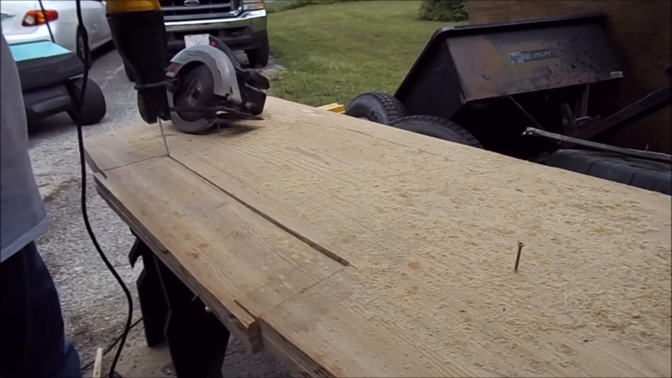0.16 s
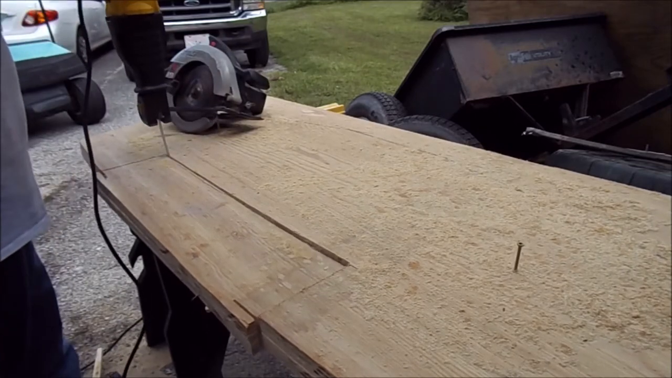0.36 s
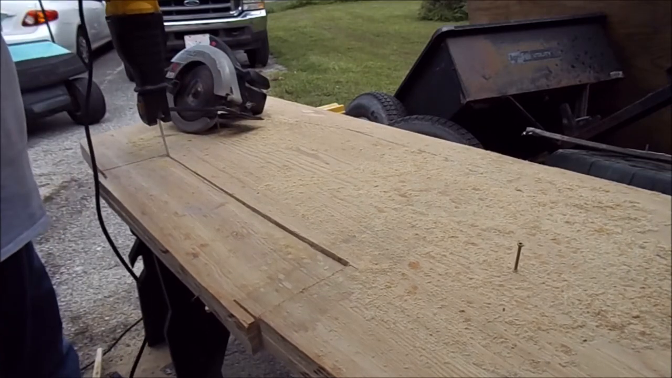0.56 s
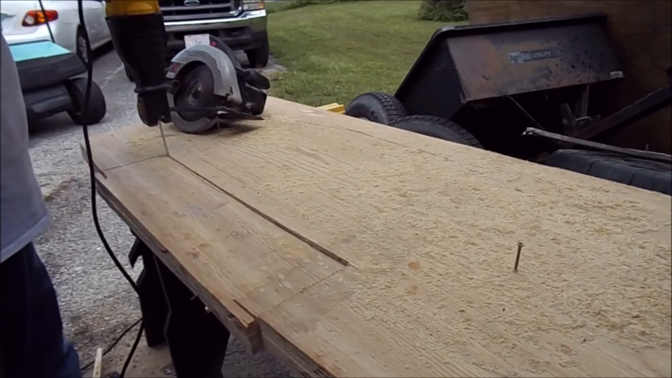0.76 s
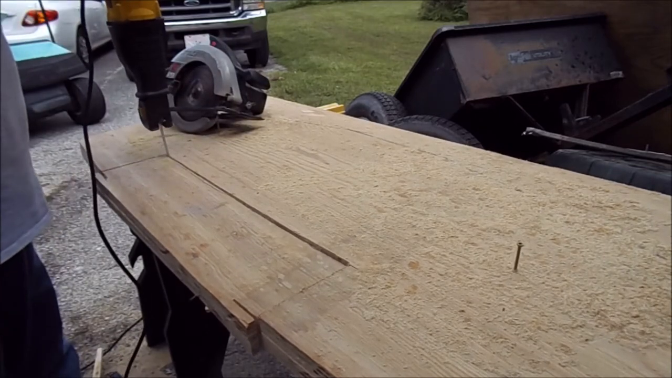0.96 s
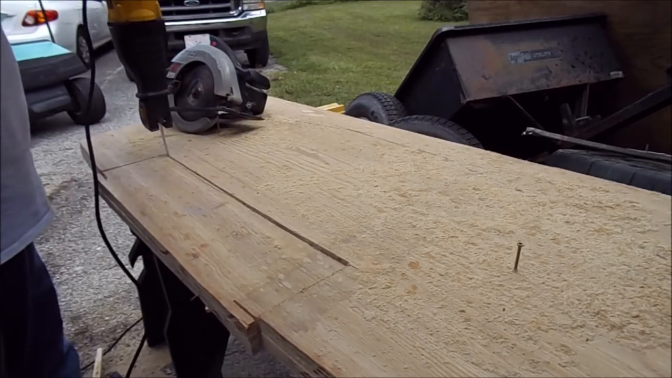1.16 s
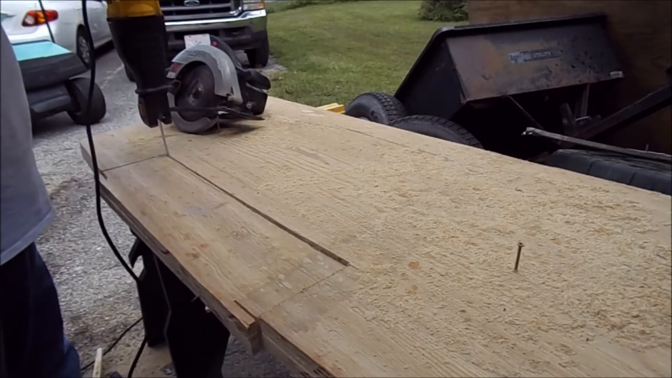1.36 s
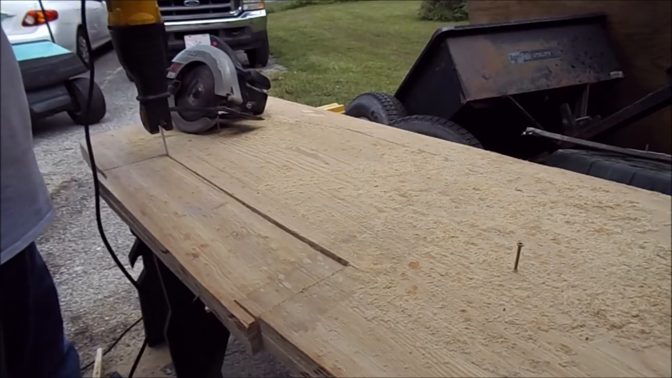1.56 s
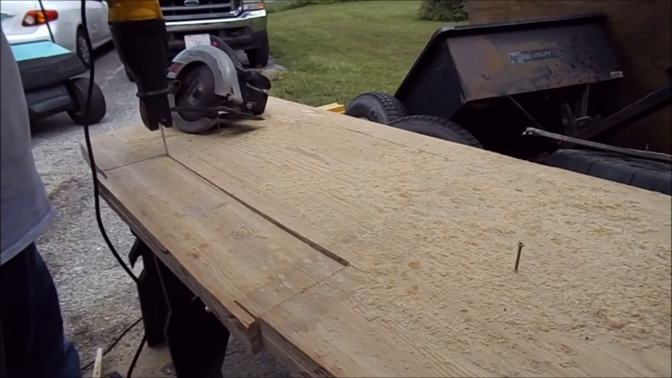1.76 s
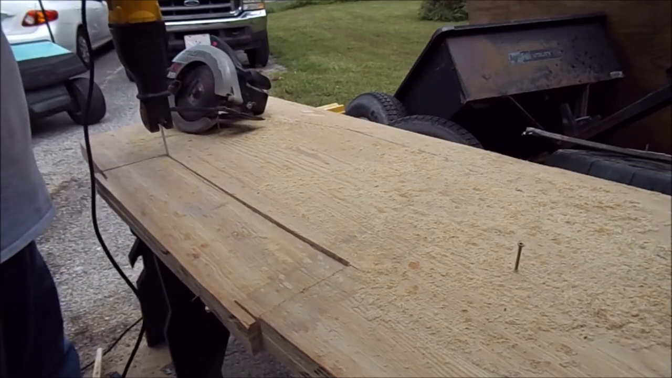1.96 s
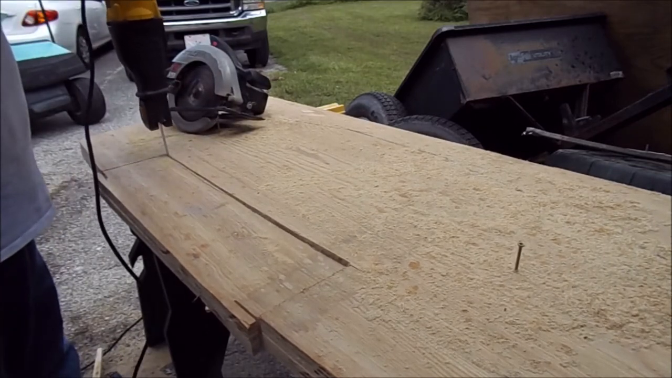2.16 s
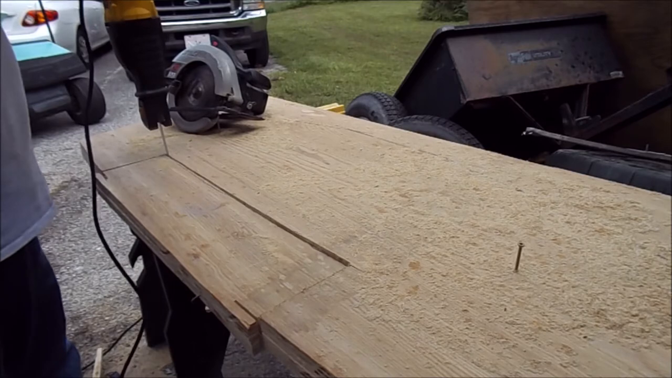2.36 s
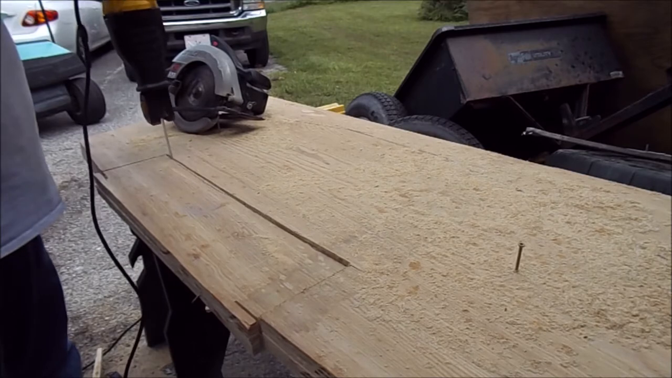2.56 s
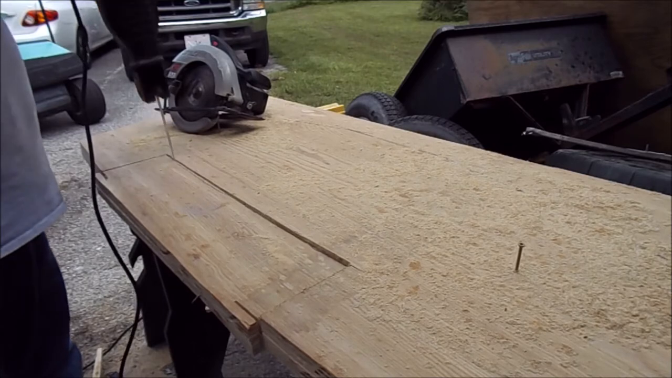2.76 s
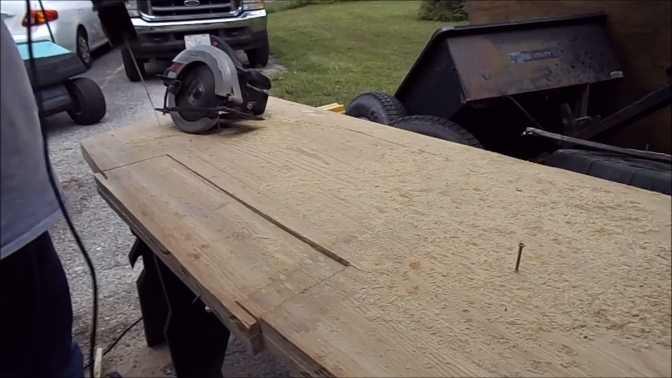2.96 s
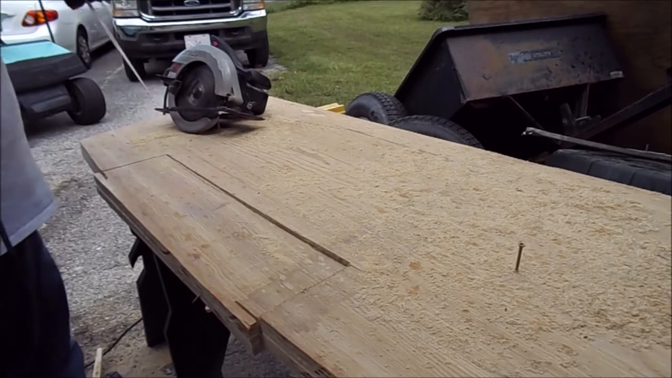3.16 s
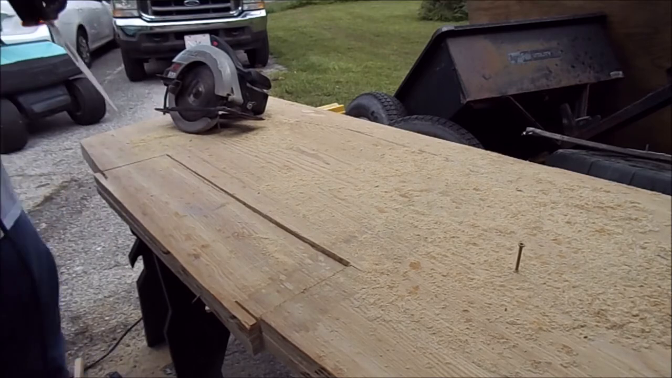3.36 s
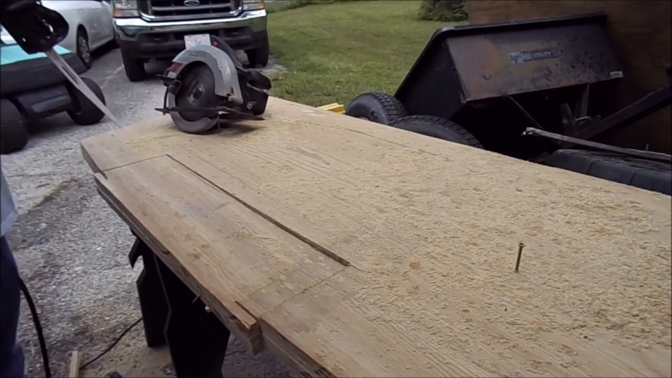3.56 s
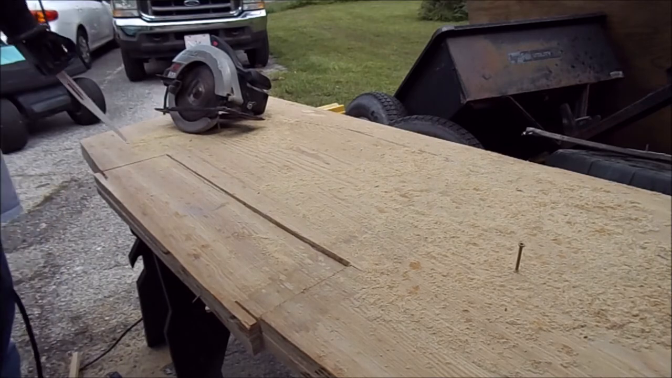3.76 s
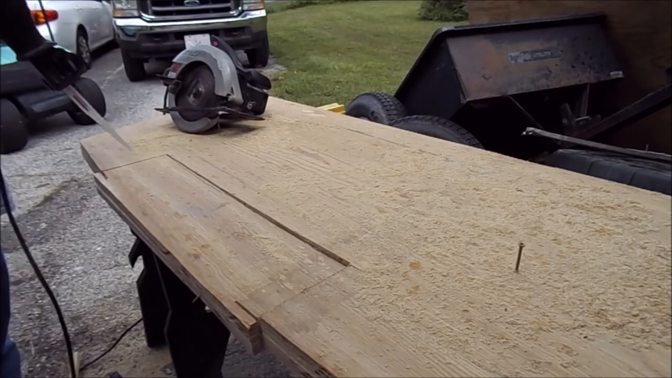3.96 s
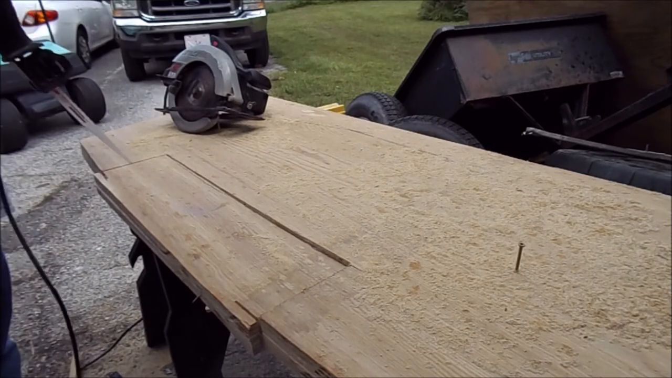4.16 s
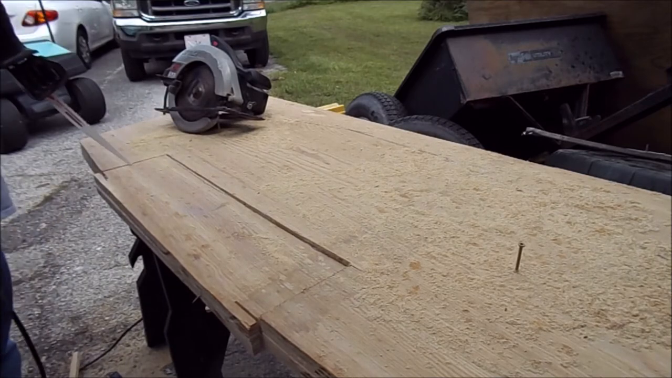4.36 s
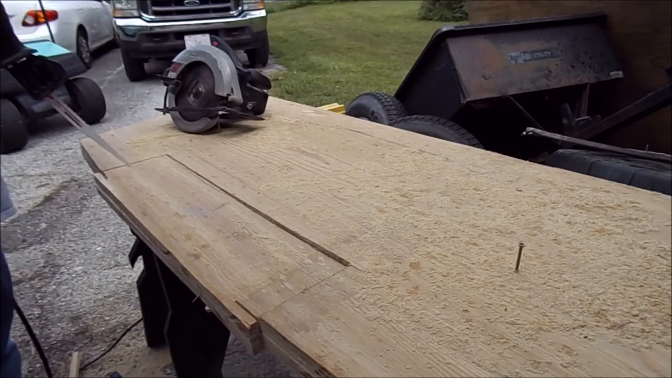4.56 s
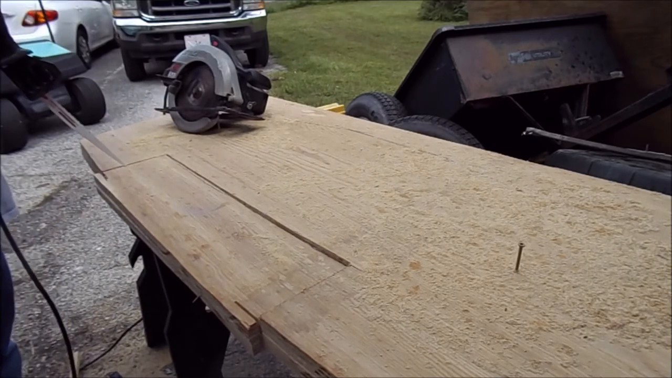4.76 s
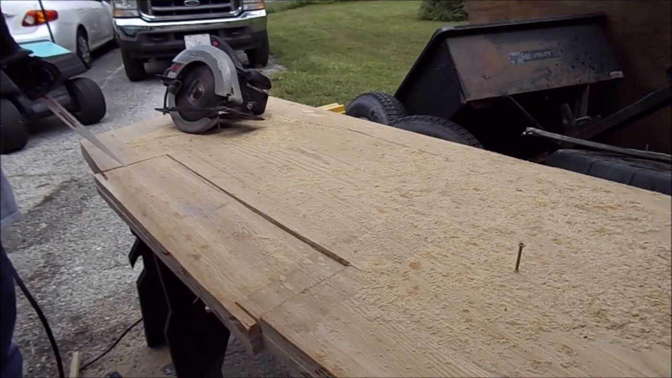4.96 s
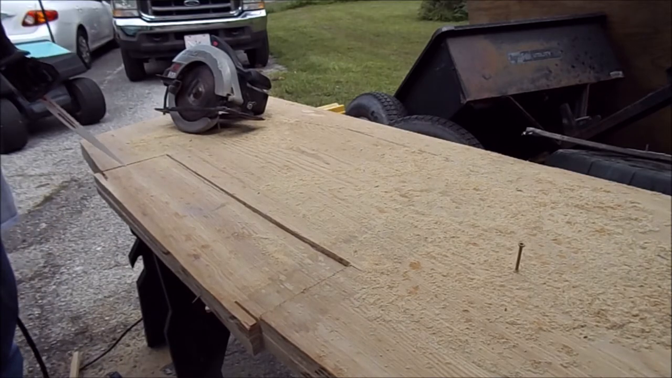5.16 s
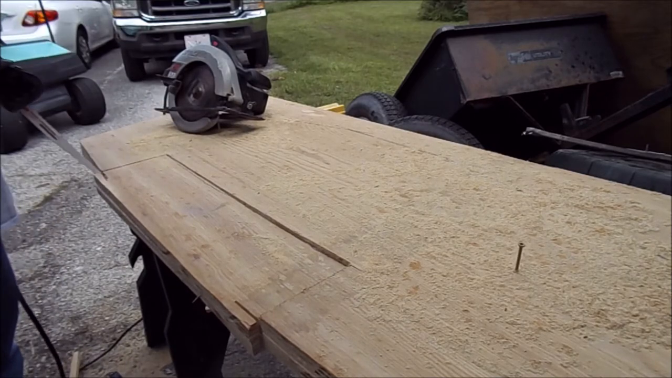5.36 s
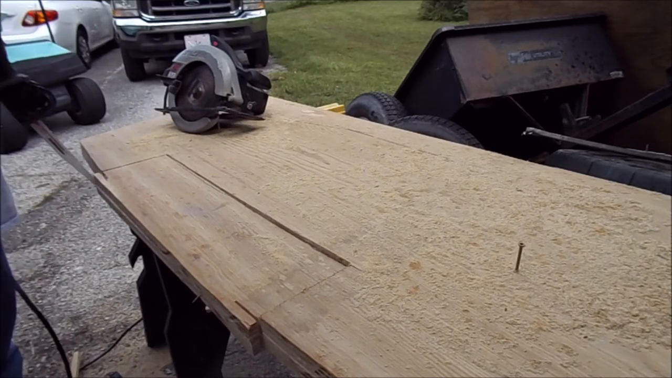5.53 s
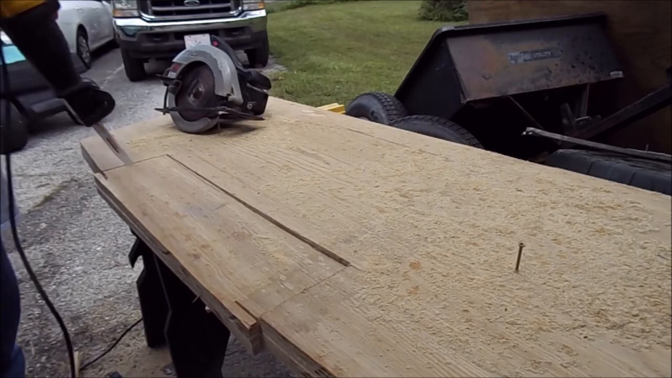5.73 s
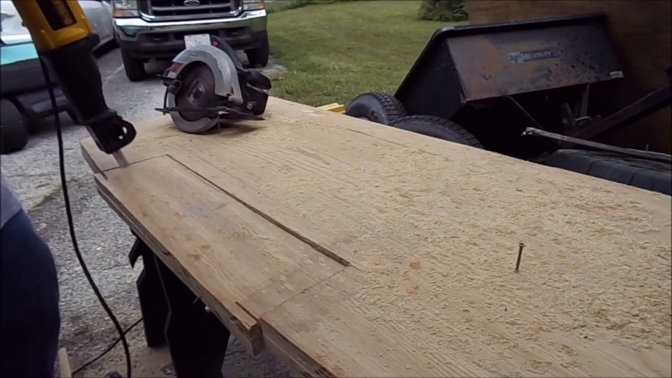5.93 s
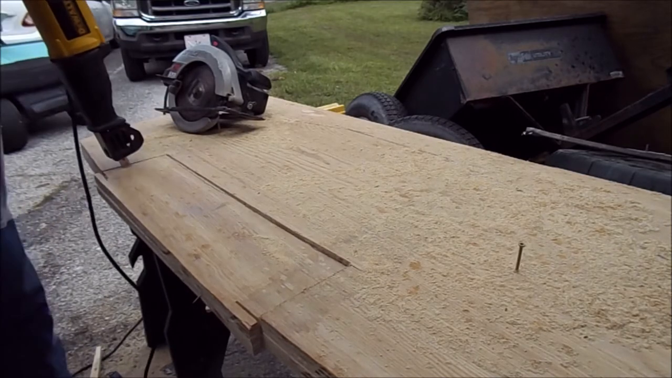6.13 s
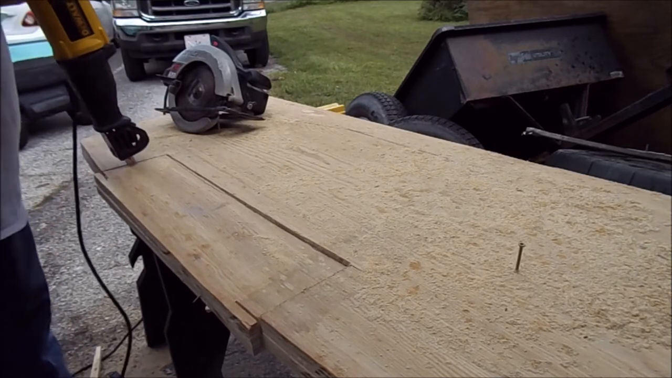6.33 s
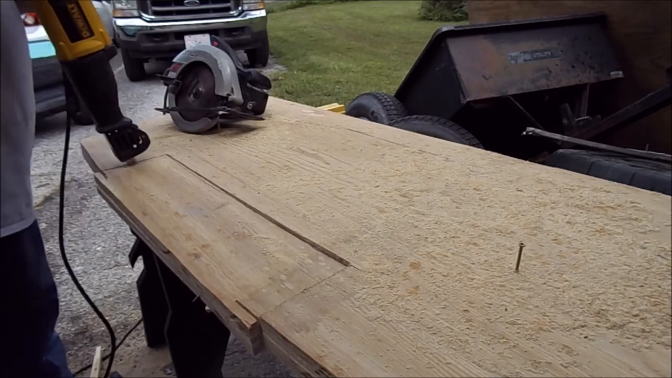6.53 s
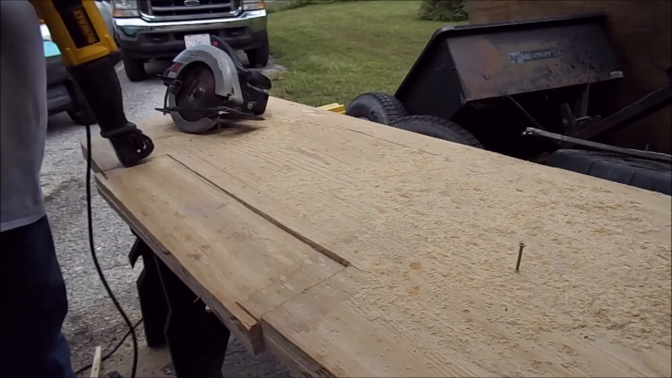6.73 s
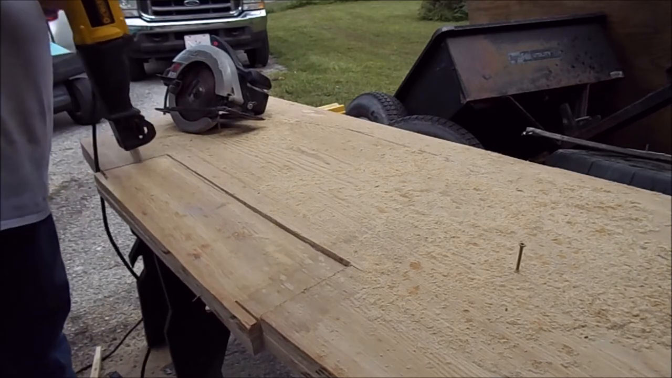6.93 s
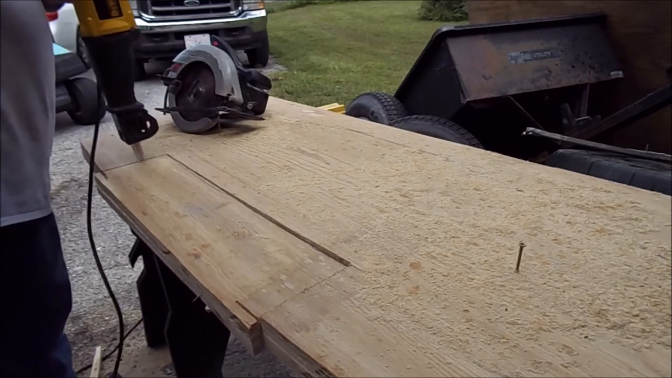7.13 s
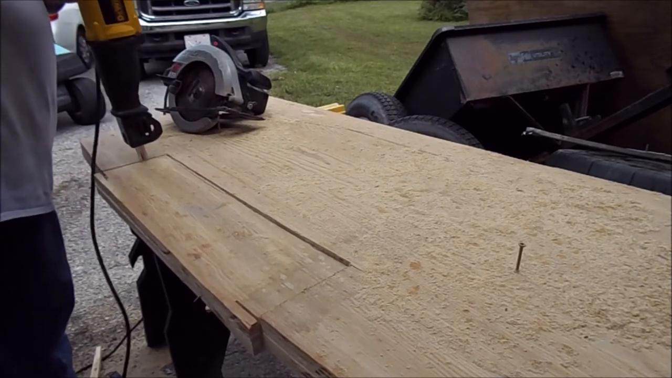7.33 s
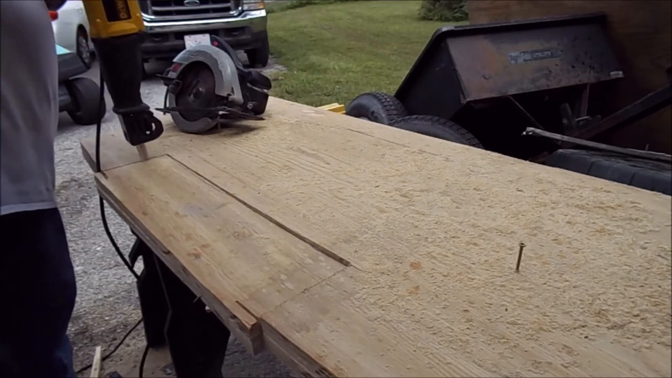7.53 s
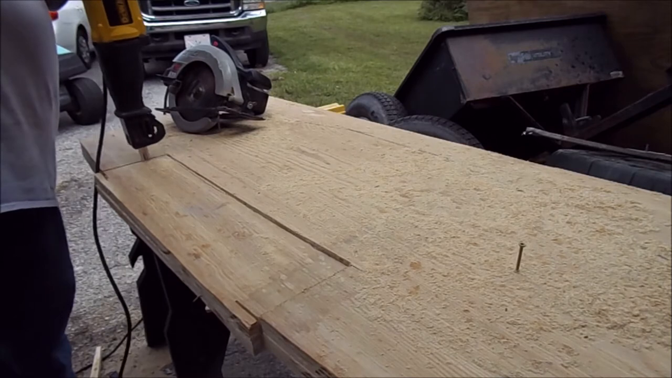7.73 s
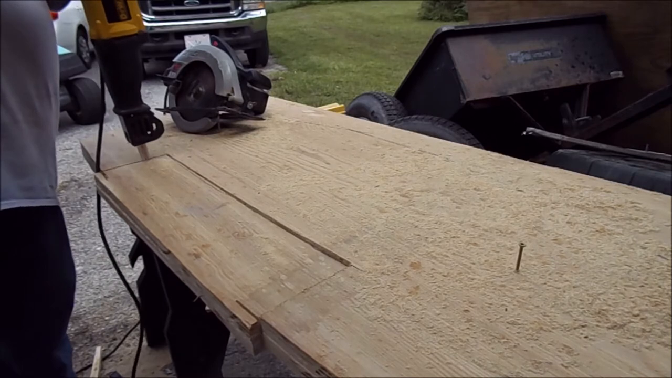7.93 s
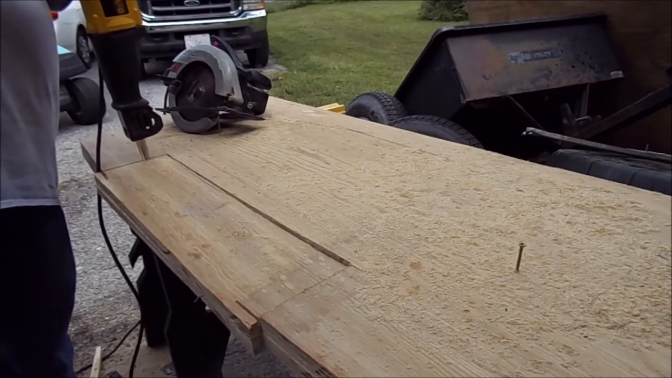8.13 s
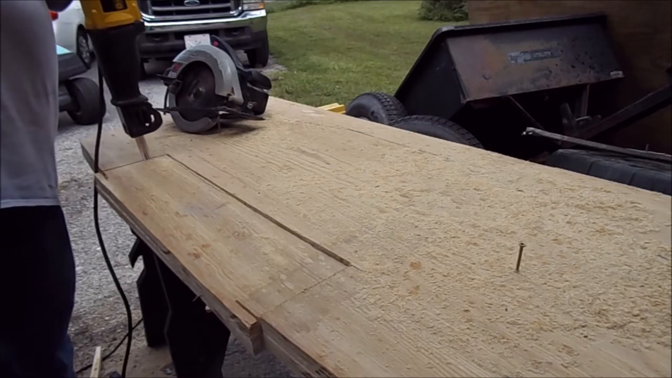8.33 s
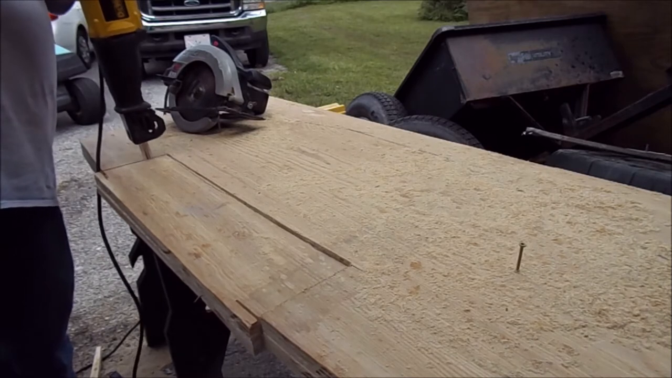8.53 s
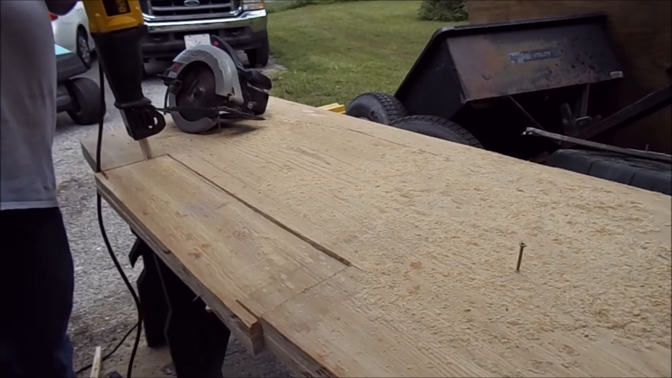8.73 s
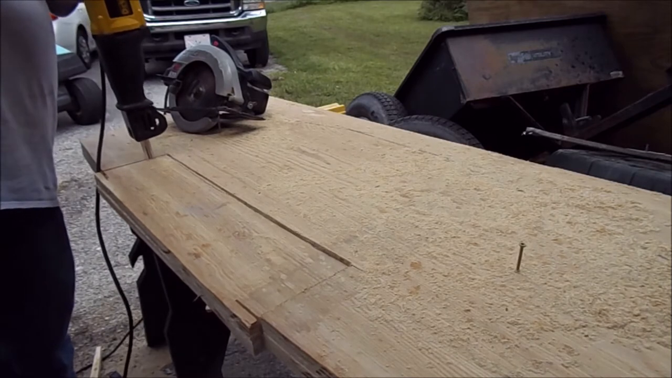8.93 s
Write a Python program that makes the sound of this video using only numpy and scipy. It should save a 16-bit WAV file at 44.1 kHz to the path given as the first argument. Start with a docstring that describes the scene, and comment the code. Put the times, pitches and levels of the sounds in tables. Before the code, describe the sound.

Outdoors, harsh fast saw chatter drops into a falling whine and ticking run-down, a few metallic taps follow, then the saw roars back into plywood.

```python
"""Reciprocating saw in plywood

Outdoors, a corded saw cuts a plywood sheet, coasts to a stop, is shifted and cuts again. Rough noise through
body resonances makes the gear rattle and sheet drumming; bright bursts at the stroke ends are blade slap.
Sines tied to the crank make the whine and stroke tones, noise-modulated ones the fan. Decaying modes make
knocks and clacks, clumped grains the scuffs, a quiet wash the yard. The microphone overloads on loud peaks."""
import sys
import numpy as np
from scipy import signal
from scipy.io import wavfile
from scipy.ndimage import uniform_filter1d

SR = 44100
rng = np.random.default_rng(int(sys.argv[2]) if len(sys.argv) > 2 else 0)


def magnitude_from_level(level_db):
    """Linear magnitude for a level in decibels (20 dB per decade)."""
    exponent = np.asarray(level_db, float) / 20
    return 10 ** exponent


def generate_wav(sig):
    """Save sig (samples, or channels by samples) to the path in sys.argv[1] as 16-bit PCM at SR."""
    pcm = np.round(np.clip(np.atleast_2d(sig).T, -1, 1) * 32767).astype(np.int16)
    wavfile.write(sys.argv[1], SR, pcm)


N = 396459

# smooth spectrum of metal scuffing wood: f/Hz, relative density/dB
SCUFF_COLOUR = [(59, -69.5), (100, -38), (498, -3.5), (1160, -1), (1770, 0.5), (3860, -9.5), (4760, -16.5),
                (15500, -34.5)]
# resonances of the scuff: f/Hz, width/Hz, relative level/dB
SCUFF_MODES = [(1790, 120, -13), (2700, 390, -11.5), (3250, 400, -11.5)]
SHAFT_PER_STROKE = 8.65  # motor turns in one stroke
STALL_HZ = 1.4  # the stroke rate at which the saw falls silent
LIFT_S, LIFT_LASTS_S, LOWER_S = 2.84, 0.72, 5  # middle and length of the lift; tool held low from here


def read(points, hz):
    """Interpolation on a logarithmic frequency axis: value of a spectrum between its points."""
    f, value = np.transpose(points)
    return np.interp(np.log(hz + 1), np.log(f + 1), value)


def evened(x):
    """Power normalisation: scales to rms 1."""
    return x / np.sqrt(np.mean(x ** 2) + 1e-20)


def colour(x, points, modes=(), under_db=0):
    """Minimum-phase filtering: a smooth spectrum with resonances standing on it, evened to rms 1."""
    hz = abs(np.fft.fftfreq(8192, 1 / SR))
    power = magnitude_from_level(2 * (read(points, hz) + under_db))
    for f, width, db in modes:
        power = power + magnitude_from_level(2 * db) / (1 + (2 * (hz - f) / width) ** 2) ** 2
    log_gain = np.log(power + 1e-10) / 2
    # the Hilbert transform of the log gain is the phase that makes the filter causal
    taps = np.fft.ifft(np.exp(log_gain - 1j * signal.hilbert(log_gain).imag)).real[:4096]
    return evened(signal.oaconvolve(x, taps)[:len(x)])


def wander(hz):
    """Low-passed randomness: slow chance of rms 1, from two equal poles."""
    step = 32
    pole = np.exp(-hz * step / SR * 2 * np.pi)
    slow = signal.lfilter([1], [1, -2 * pole, pole * pole], rng.standard_normal(N // step + 1))
    return np.interp(np.arange(N) / step, np.arange(len(slow)), evened(slow))


def grit(per_s, share, spread_db):
    """Impulsive noise: a steady hiss sharing its power with sparse sharp clicks of uneven size."""
    size_db = spread_db * np.minimum(rng.exponential(1, N), 4)
    clicks = (rng.random(N) < per_s / SR) * magnitude_from_level(size_db) * rng.choice([-1, 1], N)
    clicks = clicks / np.sqrt(uniform_filter1d(clicks ** 2, SR // 4) + 1e-9)
    share = np.clip(share, 0, 1)
    return np.sqrt(1 - share) * rng.standard_normal(N) + np.sqrt(share) * clicks


def yard():
    """Diffuse background: a quiet outdoor wash of filtered noise with a slowly wandering level."""
    # f/Hz, relative density/dB
    wash = [(18, -49), (30, -20), (97, -4), (200, -1), (324, -4), (700, 4.5), (1050, 3), (15500, -20.5)]
    return magnitude_from_level(-54.5 + .8 * wander(hz=3)) * colour(rng.standard_normal(N), wash)


def scuffs():
    """Sliding friction: shoe and blade dragged over the wood give clumped grains of noise."""
    # start/s, length/s, level/dB
    drags = [(3.978, 0.074, -39.5), (5.27, 0.17, -54.5), (5.716, 0.043, -34), (5.76, 0.11, -41),
             (5.867, 0.098, -37.5), (5.994, .28, -50.5), (6.462, .06, -42)]
    rise_db_per_s, fade_db_per_s = 700, 321
    t = np.arange(N) / SR
    levels = []
    for start, length, db in drags:
        before = np.maximum(start - t, 0)
        after = np.maximum(t - start - length, 0)
        levels.append(db - rise_db_per_s * before - fade_db_per_s * after)
    level_db = np.max(levels, axis=0) + 2.4 * wander(hz=60)
    grains = grit(per_s=900, share=.2, spread_db=0.5)
    return magnitude_from_level(level_db) * colour(grains, SCUFF_COLOUR, SCUFF_MODES, under_db=10.5)


def clacks(rows, modes, spread_db, detune):
    """Modal excitation: each blow rings the same modes, struck at another spot."""
    low_under_hz, rise_s = 1900, 0.00046
    out, t = np.zeros(N), np.arange(SR // 10) / SR
    for (s, db, low_db), luck in zip(rows, rng.standard_normal((len(rows), len(modes), 2))):
        ring = 0
        for (hz, mode_db, t60), (size, pitch) in zip(modes, luck):
            level_db = mode_db + low_db * (hz < low_under_hz) + spread_db * size - 60 * t / t60
            ring = ring + magnitude_from_level(level_db) * np.sin(2 * np.pi * hz * (1 + detune * pitch) * t)
        sound = np.minimum(t / rise_s, 1) * ring
        out[round(s * SR):][:len(t)] += magnitude_from_level(db) * sound / abs(sound).max()
    return out


def shoe_clacks():
    """Impact on a free plate: the loose steel shoe rings after each blow."""
    # t/s, peak level/dB, low modes against high/dB
    blows = [(4.305, -21, -10), (4.336, -32.5, -19), (5.713, -30, 10), (5.763, -21, 4), (5.785, -12.5, -1),
             (5.826, -24, 0), (5.881, -27, 4), (5.896, -19.5, -7), (5.944, -27, 5)]
    # f/Hz, relative level/dB, t60/s
    plate = [(1650, 0, .04), (2600, -4, .025), (2860, 1, .035), (3400, -3, .025), (3850, -8, .018)]
    return clacks(blows, plate, spread_db=3.5, detune=0.021)


def gear_clacks():
    """Backlash: play in the gears knocks the case as the tool runs down."""
    # t/s, peak level/dB
    blows = [(2.837, -18), (2.903, -10), (2.988, -12), (3.029, -10), (3.053, -11), (3.082, -15),
             (3.169, -13), (3.302, -13), (3.379, -11.5), (3.447, -12.5), (3.518, -17), (3.605, -20),
             (3.658, -25), (3.673, -28), (3.699, -33), (3.723, -30), (3.777, -27), (3.811, -32),
             (4.041, -25)]
    # f/Hz, relative level/dB, t60/s
    case = [(1170, -1.5, .018), (2050, -2, .016), (2440, 0, 0.016), (3090, 1, 0.012)]
    dulling_db_per_s = 4.0  # slower clacks favour the low modes
    rows = [(s, db, dulling_db_per_s * (s - LIFT_S - LIFT_LASTS_S)) for s, db in blows]
    return clacks(rows, case, spread_db=5.5, detune=0.033)


def knocks():
    """Impact of metal on wood: short modes, a crack, and a burst of rough noise that dies with them."""
    # hard taps: t/s, peak level/dB, pitch f/Hz, treble against it/dB
    taps = [(4.221, -31, 1010, -32), (4.414, -35.5, 2390, -26), (4.546, -35, 1400, -9),
            (4.575, -19, 1037, -16.5), (5.723, -18.5, 2170, -8), (5.972, -22, 1960, -29),
            (6.087, -20.5, 2900, -13), (6.272, -27, 2190, -37), (6.31, -32, 2280, -27.5),
            (6.454, -16.5, 2040, -20), (6.532, -12, 1830, -26.5)]
    # glancing bumps (blade leaves the cut, tool is shifted, first strokes bite): t/s, peak level/dB,
    # pitch f/Hz, treble against it/dB
    bumps = [(2.772, -4.5, 2100, -11.5), (3.985, -27.5, 896, -10.5), (4.302, -23, 2880, -12),
             (4.326, -30.5, 3200, -14), (4.586, -36.5, 1028, -24), (5.183, -24, 1310, -9.5),
             (5.363, -29, 1480, -31), (5.44, -33, 1170, -3.5), (5.71, -20, 1886, -17),
             (5.784, -19.5, 1914, -31), (5.895, -22, 2720, -25.5), (5.928, -27, 1790, -19.5),
             (6.053, -28.5, 513, -26.5), (6.491, -21.5, 2344, -20), (6.599, -1, 2270, -21),
             (6.684, -2.5, 3050, -14), (6.721, -1, 2750, -16)]
    # rise/ms, first snap level/dB, of a tap and of a bump
    tap_onset = (0.62, 8)
    bump_onset = (6, -9)
    # wooden modes: factor on pitch, relative level/dB, t60/s
    wood = [(0.98, 12, 0.04), (0.85, -4.5, 0.095), (0.73, 0, 0.071)]
    # f/Hz, relative density/dB
    crack = [(2500, -16.5), (5500, 8.5), (15500, -14.5)]
    burst_t60, snap_t60 = 0.065, .012  # s
    out, t = np.zeros(N), np.arange(SR // 5) / SR
    grains = grit(per_s=520, share=.4, spread_db=-1.5)
    rough = colour(grains, SCUFF_COLOUR, SCUFF_MODES, under_db=-13.0)
    bright = colour(rng.standard_normal(N), crack)
    rows = [(*row, *tap_onset) for row in taps] + [(*row, *bump_onset) for row in bumps]
    phases = rng.random((len(rows), len(wood)))
    for (s, db, hz, treble_db, rise_ms, snap_db), turn in zip(rows, phases):
        start = round((s - rise_ms / 2000) * SR)  # the time marks the middle of the rise
        at = slice(start, start + len(t))
        ring = sum(magnitude_from_level(d - 60 * t / t60) * np.sin(2 * np.pi * (hz * factor * t + phase))
                   for (factor, d, t60), phase in zip(wood, turn))
        burst = (magnitude_from_level(9.0) * rough[at] + magnitude_from_level(treble_db + 9.0) * bright[at]) * magnitude_from_level(-60 * t / burst_t60)
        rise = np.minimum(1000 * t / max(rise_ms, .2), 1) ** 2
        sound = (ring + burst) * (1 + magnitude_from_level(snap_db - 60 * t / snap_t60)) * rise
        out[at] += magnitude_from_level(db) * sound / abs(sound).max()
    return out


def echoes(hits):
    """Multiple reflection: ground and parked cars return a tail of dying echoes of either sign."""
    taps = np.zeros(SR // 8)
    at = np.arange(250, len(taps) - 40, 40)
    gain = magnitude_from_level(-20.0 - 60 * at / SR / 0.17)  # t60 0.17 s
    taps[at + rng.integers(0, 40, len(at))] = rng.choice([-1, 1], len(at)) * gain
    return signal.oaconvolve(hits, taps)[:N]


def strokes(t):
    """Rotor dynamics: stroke rate in Hz climbs under power, runs down against friction and drag."""
    # full speed as the load allows it: t/s, stroke rate f/Hz
    full_speed = [(.9, 35.95), (1.6, 36.35), (2.3, 37.4), (7, 37.8), (8.35, 37.7), (8.99, 36.9)]
    # a jerk and a slower climb: shortfall at the pull f/Hz, time constant/s
    spin_up = [(12.3, .035), (19.5, .22)]
    pull_s, release_s, repull_s = -.35, 2.42, 6.52  # trigger pulled, let go, pulled again
    friction, drag = 15.2, .0165  # bearings in Hz per s; fan in Hz per s per Hz squared
    since = t - np.where(t < repull_s, pull_s, repull_s)
    shortfall = sum(hz * np.exp(-since / s) for hz, s in spin_up)
    driven = np.interp(t, *np.transpose(full_speed)) - shortfall
    # constant plus square-law braking makes the speed a tangent of time
    knee = np.sqrt(friction / drag)
    angle = np.arctan(np.interp(release_s, t, driven) / knee) - friction / knee * (t - release_s)
    run_down = np.maximum(knee * np.tan(np.clip(angle, 0, 1)), STALL_HZ)
    coasting = (t > release_s) & (t < repull_s)
    return np.where(coasting, run_down, driven), coasting


def fan_whirr(t, turns, free):
    """Narrow-band noise: slow noise on a carrier tied to the crank gives the cooling fan's fuzzy bands."""
    # multiple of the stroke, noise bandwidth setting/Hz
    bands = [(251, 130), (258, 150), (268, 130), (311.4, 100)]
    # level against the hiss/dB: held upright, held low
    band_db = [(-10, -11.5), (-17, -22.5), (-20.5, -10.5), (-11, -12)]
    out = np.zeros(N)
    for (multiple, hz), db in zip(bands, band_db):
        level = magnitude_from_level(np.where(t < LOWER_S, *db)) * (1 - free) ** 0.83
        out += level * wander(hz) * np.sin(2 * np.pi * multiple * turns)
    return out


def slot_whine(speed, turns, coasting, free):
    """Harmonic series of the slot-passing frequency, loudest where the casing rings."""
    # f/Hz, level against the hiss/dB before the changes with load and speed
    casing = [(3900, -18), (5000, -8), (6700, -2.5), (7800, -17), (9000, -11), (10000, -16.5), (10800, -9),
              (11700, -23.5), (13000, -27.5), (15000, -35)]
    per_stroke = 12 * SHAFT_PER_STROKE  # 12 armature slots
    # the load shakes the pitch
    slots = per_stroke * turns + np.where(coasting, .011, .045) * wander(hz=60)
    # fainter without current, clearer as the air noise dies, gone near rest
    coasting_db = 24 * free - 19 - 2.5 * np.maximum(8 - speed, 0)
    load_db = np.where(coasting, coasting_db, -40 * free)
    out = np.zeros(N)
    for k in range(1, 21):  # as the motor slows, higher multiples fall into hearing
        hz = k * per_stroke * speed
        fading_db = 5.0 * np.minimum(wander(hz=16), .6)  # each tone fades in and out
        out += (hz < 15500) * magnitude_from_level(read(casing, hz) + load_db + fading_db) * np.sin(2 * np.pi * k * slots)
    return out


def air_hiss(swing, chatter):
    """Turbulence and brush noise: gritty broadband noise swinging with the stroke."""
    # f/Hz, relative density/dB
    spectrum = [(2060, -38.5), (3500, -6), (4550, -10.5), (6450, -13), (8230, -14.5), (9380, -13.5),
                (10600, -18), (11700, -16), (15500, -27.5)]
    noise = swing * grit(per_s=1100, share=0.12, spread_db=12.5) * chatter ** .4
    return colour(noise, [(400, -79.5)] + spectrum)


def stroke_lines(t, turns):
    """Periodic forcing: clean sines at multiples of the stroke rate."""
    # multiples of the stroke, the last from the gear teeth
    multiples = [3, 4, 5, 6, 7, 9, 13, 14, 16, 18, 21, 54.2]
    # level against the rattle/dB: in the first cut, in the second
    line_db = [(-39.5, -52), (-47.5, -46), (-32, -34.5), (-42, -38.5), (-34, -33.5), (-37, -34.5),
               (-27.5, -29.5), (-29, -34.5), (-34, -27), (-26, -20.5), (-20.5, -38), (-9, -33.5)]
    out = np.zeros(N)
    for k, db in zip(multiples, line_db):
        level = magnitude_from_level(np.where(t < LOWER_S, *db) + 0.6 * wander(hz=12))
        out += level * np.sin(2 * np.pi * (k * turns + rng.random()))
    return out


def sheet_drum(t, swing):
    """Plate resonance: the noise of the teeth drives the modes of the sheet while the blade is in it."""
    # modes in each cut: f/Hz, width/Hz, relative level/dB
    cuts = [(494, 44, -8), (565, 40, -1.5), (648.3, 32, 1), (744.7, 28, 4), (819, 66, -3)], [(491.3, 14, 2),
            (581, 66, 1), (655, 24, 12.5), (852, 41, 2)]
    # t/s, level against the rattle/dB
    drum = [(0, -8.5), (.7, -8.5), (2.1, -10.5), (6.5, -16), (6.75, -16), (6.9, -11.5), (7.04, -12.5),
            (7.3, -20), (8.2, -16.5), (8.99, -18)]
    through_s = 2.12  # the blade breaks out of the first cut
    cutting = uniform_filter1d(1. * ((t < through_s) | (t > LOWER_S)), SR // 20)
    teeth = swing * rng.standard_normal(N)
    first, second = (colour(teeth, [(1, -90), (SR, -90)], modes) for modes in cuts)
    return magnitude_from_level(np.interp(t, *np.transpose(drum))) * cutting * np.where(t < LOWER_S, first, second)


def blade_slaps(t, turns, speed):
    """Repeated impact: two bright bursts of uneven size a stroke, staying short and sharp as the strokes slow
    in the coast."""
    # t/s, level against the rattle/dB
    slap_db = [(0, -16.5), (2.4, -7), (2.9, -19), (4, -15), (6.5, -6.5), (7.2, -5.5), (8.99, -11)]
    # f/Hz, width/Hz, relative level/dB
    ringing = [(3380, 1140, 0.5), (2294, 1020, 1)]
    slap_s, partner, width_s = 7.0415, .4, 0.0015  # one slap's time; its partner's place in turns
    phase = turns - np.interp(slap_s, t, turns)
    halves = np.interp(phase % 1, [0, partner, 1], [0, 1, 2]) + 2 * np.floor(phase)
    nearest = np.round(halves).astype(int)
    size_db = 5.8 * rng.standard_normal(np.ptp(nearest) + 1).clip(-3, 1.5)[nearest - nearest.min()]
    pulse = np.exp(-((halves - nearest) / (2 * speed * width_s)) ** 2)
    burst = magnitude_from_level(size_db) * pulse * rng.standard_normal(N)
    return magnitude_from_level(np.interp(t, *np.transpose(slap_db))) * colour(burst, [(1, -90), (SR, -90)], ringing)


def motor_ticks(shaft, free):
    """Gear chatter: one tick of uneven size a motor turn, dying before the next, plainer at low speed."""
    size_db = 2.0 * rng.standard_normal(round(shaft.max()) + 3)[np.floor(shaft).astype(int) + 1]
    return magnitude_from_level(free * (size_db - 14 * (shaft % 1) + 6.0))


def gear_rattle(t, swing, chatter, shaft, free, coasting):
    """Source and filter: gear noise and clicks ring the tool body, whose modes change with its hold."""
    # held upright, smooth spectrum: f/Hz, relative density/dB; modes: f/Hz, width/Hz, relative level/dB
    upright = [(35, -57.5), (60, -68), (288, -22), (738, -6), (1250, -5), (1380, -5), (2260, 2),
               (6500, -23.5), (8450, -48), (14300, -120)]
    upright_modes = [(1400, 77, 0.5), (1900, 280, -3), (2310, 13, 8), (3036, 51, -2), (3402, 53, -3)]
    # lifted free, the same columns
    lifted = [(35, -89), (60, -60), (1010, 8), (2490, 1), (2800, -3.5), (3030, -1), (3750, -19),
              (6500, -10), (8450, -20.5), (14300, -120)]
    lifted_modes = [(1136, 240, 5.1), (2480, 230, 15), (3090, 260, 11)]
    # held low, the same columns
    low = [(35, -75), (60, -69), (443, -16.5), (656, -8.5), (782, -4.5), (2390, 2.5), (3030, 1.5),
           (6500, -28.5), (8450, -57), (14300, -120)]
    low_modes = [(1400, 40, 0.5), (2520, 88, -1.5), (3050, 98, 2.5), (3386, 19, 6), (4170, 56, -7)]
    new_turn = np.diff(np.maximum.accumulate(np.floor(shaft)), prepend=0).clip(0, 1)
    clicks = magnitude_from_level(10) * free * coasting * new_turn  # a click each slow motor turn
    gears = swing * chatter * (grit(per_s=900, share=0.13, spread_db=2.5) + clicks)
    lift = np.clip((t - LIFT_S) / LIFT_LASTS_S + .5, 0, 1) * (t < LOWER_S)
    return (colour(gears, upright, upright_modes, under_db=-3.0) * np.sqrt(1 - lift) * (t < LOWER_S)
            + colour(gears, lifted, lifted_modes, under_db=7) * np.sqrt(lift)
            + colour(gears, low, low_modes, under_db=-3.5) * (t >= LOWER_S))


def saw():
    """Common drive: everything that turns with the crank shares its phase, speed and swings."""
    # swing over one stroke, for rattle, hiss and sheet: times a stroke, depth/dB, lag/turns
    swing_rows = [
        [(1, 0.5, 0.18), (3, 1.5, 0.66)],
        [(1, 1, 0.93), (2, 1, 0.51)],
        [(1, -3, 0.54), (2, -4, 0.96)],
    ]
    # rattle at full speed as the blade is pressed: t/s, level/dB
    bite = [(0, -8.5), (1.1, -8.5), (2.1, -10.5), (2.5, -12), (2.78, -14), (2.9, -17.5), (6.5, -12.5),
            (6.8, -10.5), (7.1, -10.5), (8.99, -8.5)]
    # hiss at full speed, level/dB: held upright, held low
    full_hiss_db = -18.5, -17.5
    # level gained for a tenfold speed
    driven_slope_db, coasting_slope_db, hiss_slope_db = 19.5, 25, 40
    t = np.arange(N) / SR
    speed, coasting = strokes(t)
    running = uniform_filter1d(1. * (speed > STALL_HZ), SR // 100)
    speed = uniform_filter1d(speed, SR // 20)
    turns = np.cumsum(speed) / SR
    decades = np.log10(speed / speed.max())
    rattle_slope_db = np.where(coasting, coasting_slope_db, driven_slope_db)
    rattle_db = np.interp(t, *np.transpose(bite)) + rattle_slope_db * decades
    hiss_db = np.where(t < LOWER_S, *full_hiss_db) + hiss_slope_db * decades - rattle_db
    hiss_db = np.maximum(hiss_db, -12.5)  # against the rattle; near rest the gears still hiss

    loose = turns + 0.027 * wander(hz=30.5)  # play in the crank: no two strokes alike
    # the blade catches for an instant and all goes quiet
    bind_db = -7 * speed / speed.max() * np.clip(wander(hz=89.5) - .9, 0, 1.3)
    swings = []
    for rows in swing_rows:
        stroke_db = sum(db * np.cos(2 * np.pi * (k * loose - lag)) for k, db, lag in rows)
        swings.append(magnitude_from_level(stroke_db + bind_db + 0.58 * wander(hz=60)))
    rattle_swing, hiss_swing, sheet_swing = swings

    free = np.clip(1.05 - speed / 36, 0, 1)  # slower gears chatter in single clicks
    shaft = SHAFT_PER_STROKE * turns + 0.16 * wander(hz=30)
    chatter = motor_ticks(shaft, free)
    hiss = air_hiss(hiss_swing, chatter)
    hiss += slot_whine(speed, turns, coasting, free) + fan_whirr(t, turns, free)
    noisy = gear_rattle(t, rattle_swing, chatter, shaft, free, coasting)
    noisy += blade_slaps(t, loose, np.where(coasting, speed, speed.max()))
    noisy += sheet_drum(t, sheet_swing) + magnitude_from_level(hiss_db) * hiss
    # a small tool radiates no bass
    noisy = signal.sosfilt(signal.butter(3, 140, "high", fs=SR, output="sos"), noisy)
    lines = (1 - free) ** np.where(coasting, 9, 2.5) * stroke_lines(t, turns)
    return running * magnitude_from_level(rattle_db) * (noisy + lines)


def scene():
    """Superposition: saw, impacts with their echoes, scuffs and yard add linearly."""
    hits = signal.sosfilt(signal.butter(2, 150, "high", fs=SR, output="sos"), knocks())
    hits += gear_clacks() + shoe_clacks()
    return (saw() + hits + echoes(hits) + scuffs() + yard())[None]


def roll_off(x):
    """The treble ends steeply here."""
    return signal.sosfilt(signal.butter(12, 15690, fs=SR, output="sos"), x)


def record(dry):
    """Saturation: a soft knee and overload, a coupling capacitor that thins the bass, a converter's ceiling."""
    over = np.maximum(abs(dry) - .75, 0)
    knee = abs(dry) - over + 1.0 * np.tanh(over / 1.3)
    bent = np.clip(np.sign(dry) * knee, -1.03, 1.03)
    coupled = signal.lfilter(*signal.butter(1, 90, "high", fs=SR), bent)
    return roll_off(np.clip(coupled, -1, 1))


dry = scene()
out = record(dry)
generate_wav(out)
```